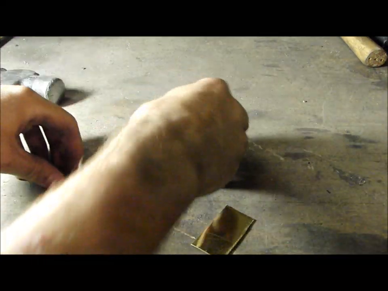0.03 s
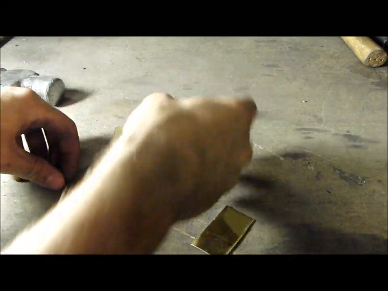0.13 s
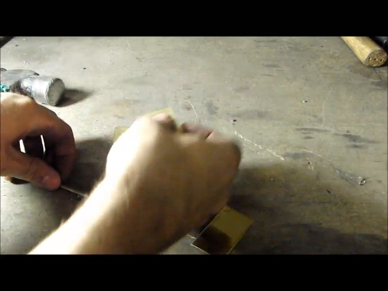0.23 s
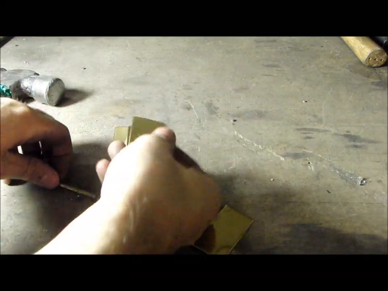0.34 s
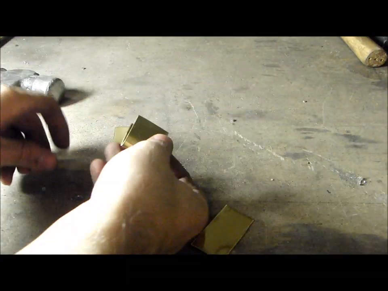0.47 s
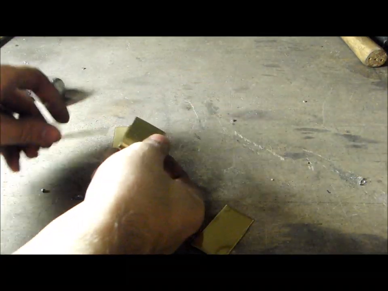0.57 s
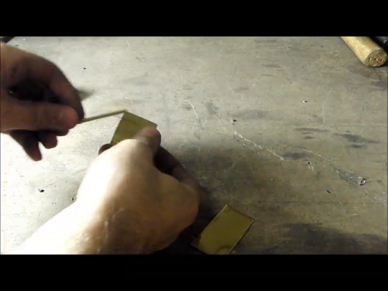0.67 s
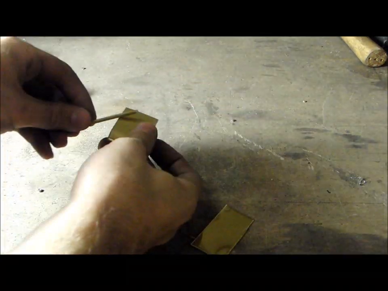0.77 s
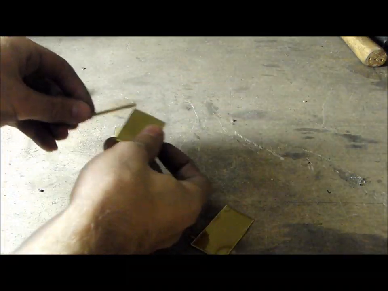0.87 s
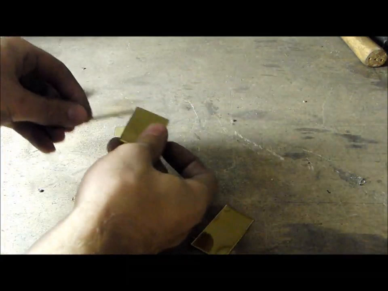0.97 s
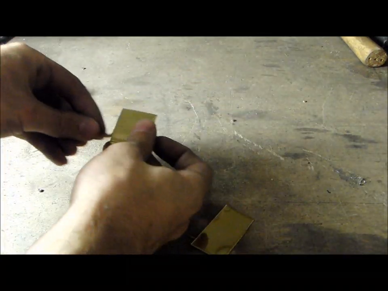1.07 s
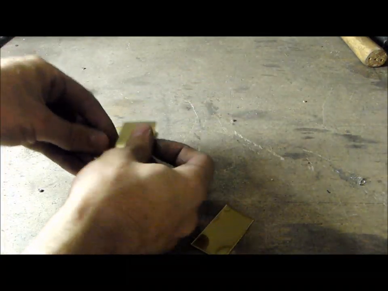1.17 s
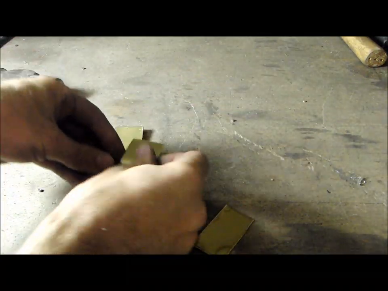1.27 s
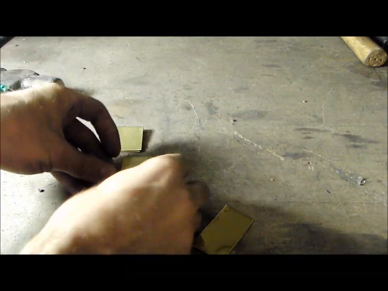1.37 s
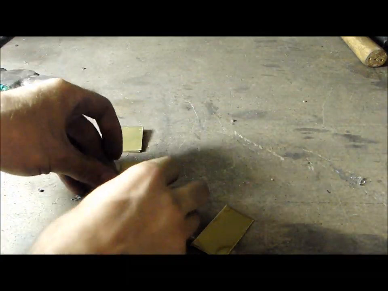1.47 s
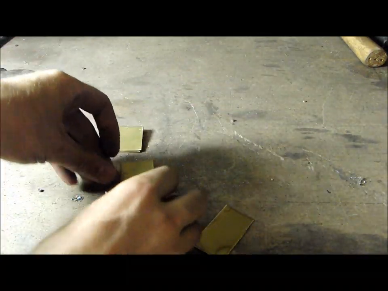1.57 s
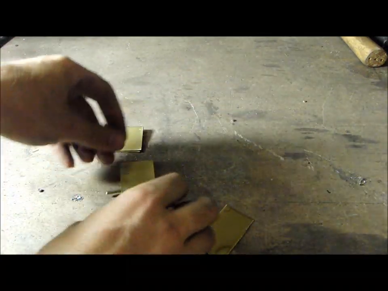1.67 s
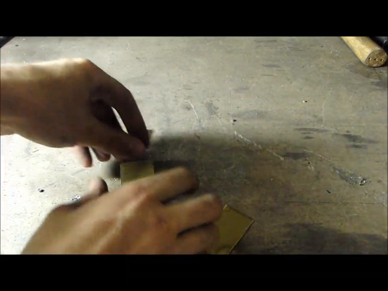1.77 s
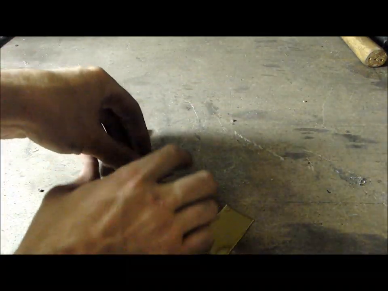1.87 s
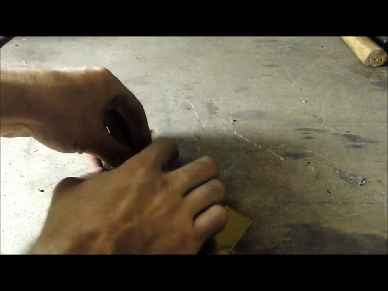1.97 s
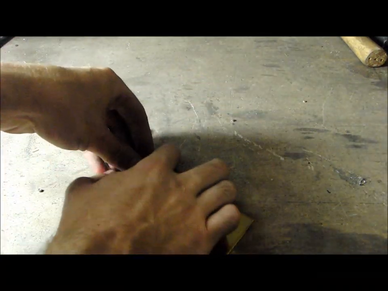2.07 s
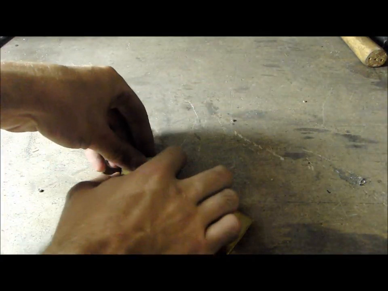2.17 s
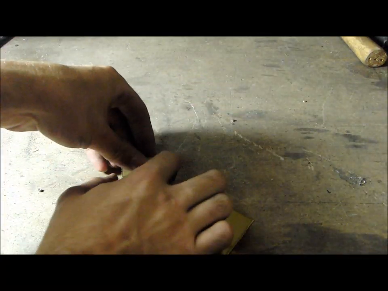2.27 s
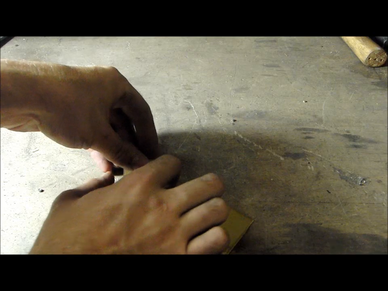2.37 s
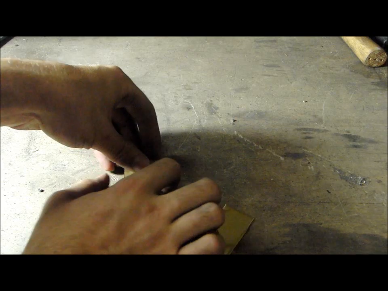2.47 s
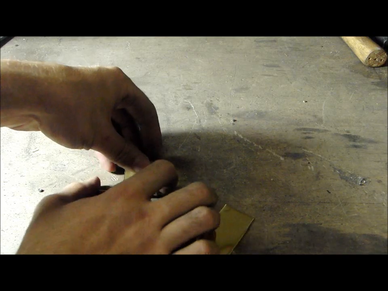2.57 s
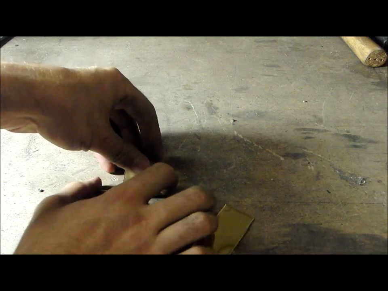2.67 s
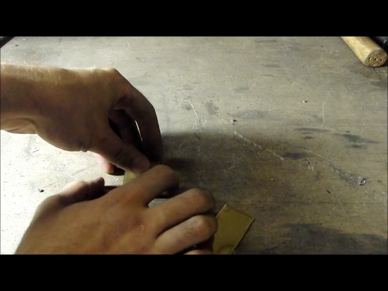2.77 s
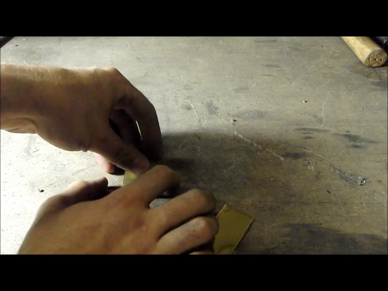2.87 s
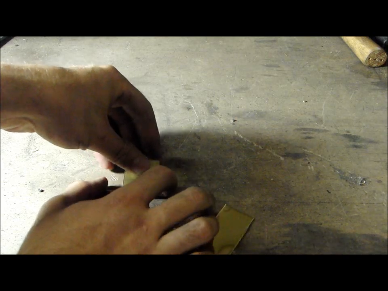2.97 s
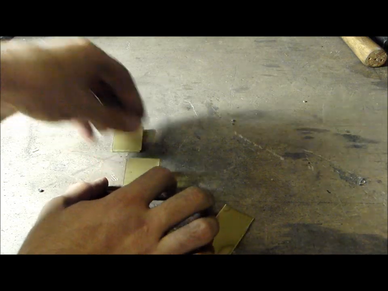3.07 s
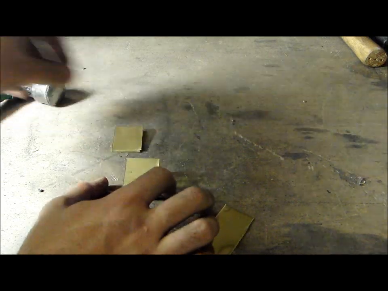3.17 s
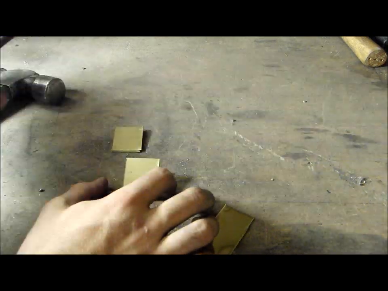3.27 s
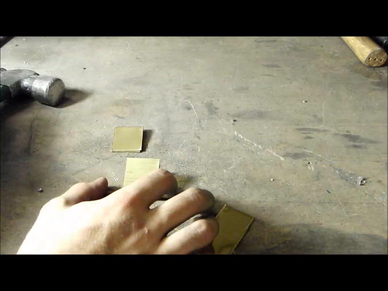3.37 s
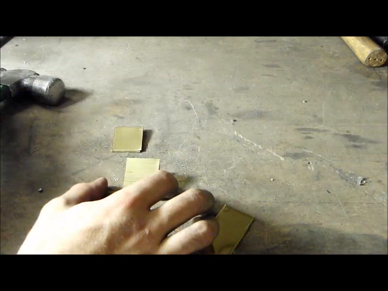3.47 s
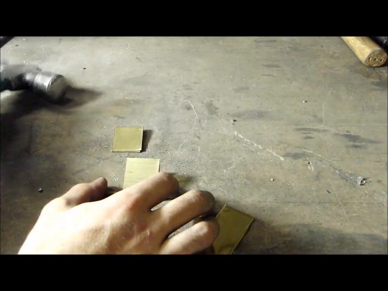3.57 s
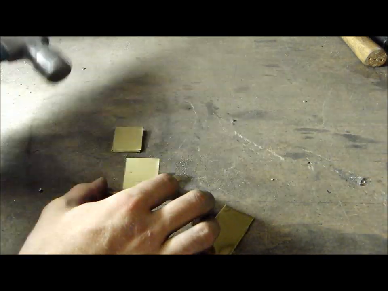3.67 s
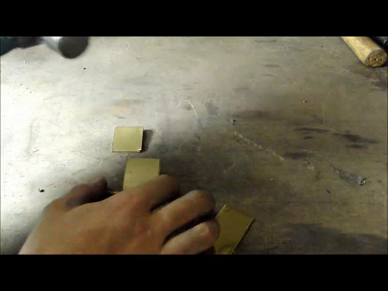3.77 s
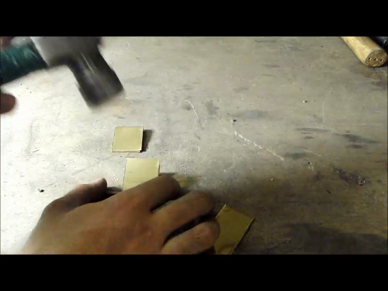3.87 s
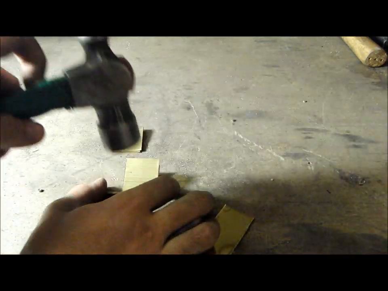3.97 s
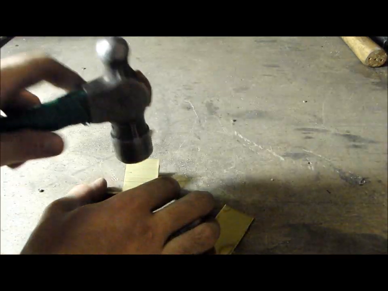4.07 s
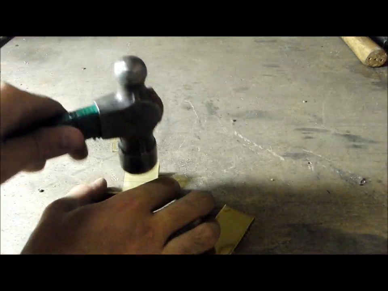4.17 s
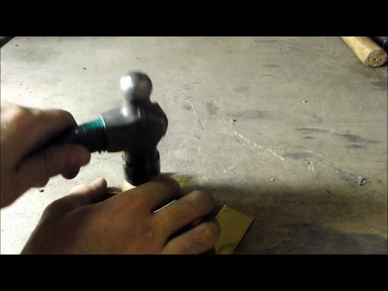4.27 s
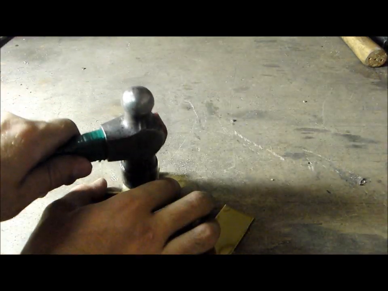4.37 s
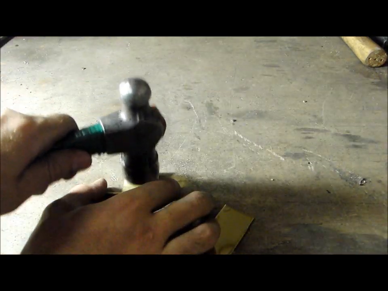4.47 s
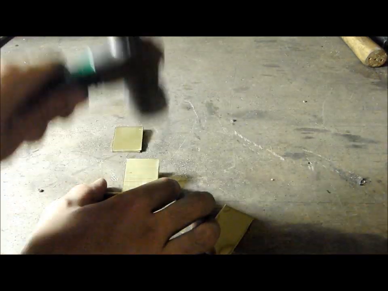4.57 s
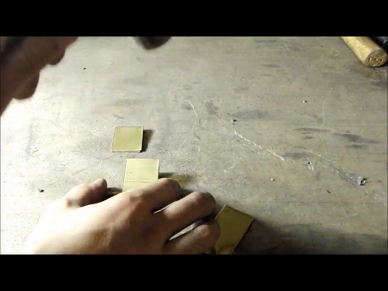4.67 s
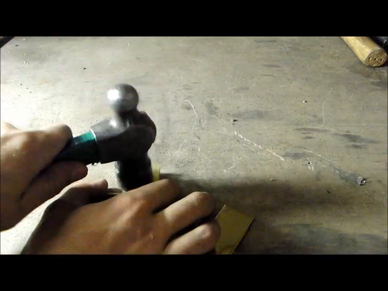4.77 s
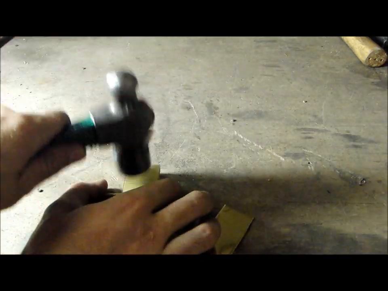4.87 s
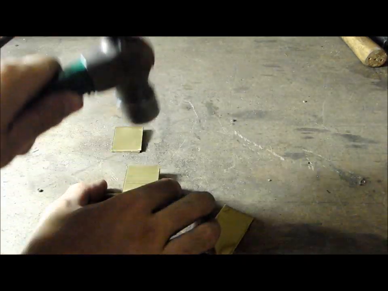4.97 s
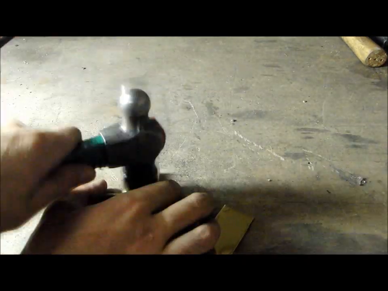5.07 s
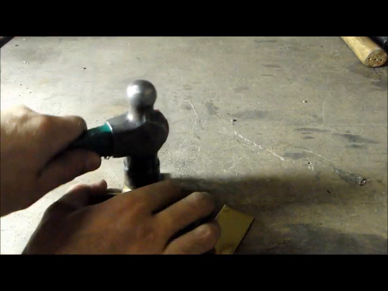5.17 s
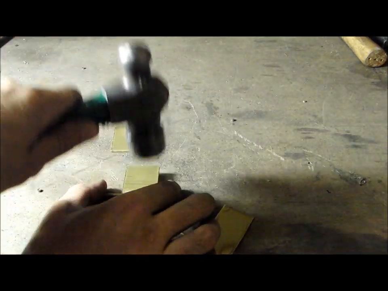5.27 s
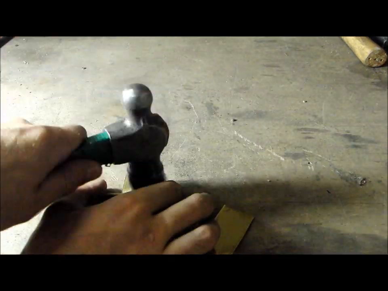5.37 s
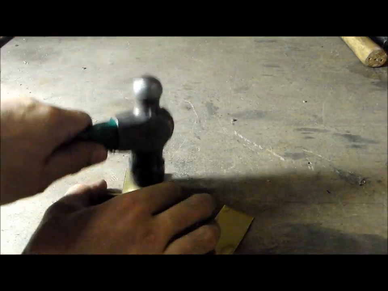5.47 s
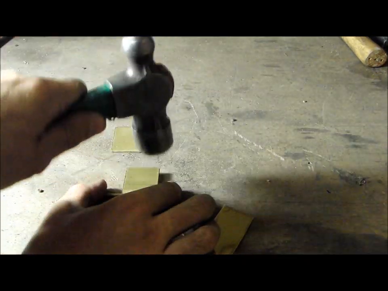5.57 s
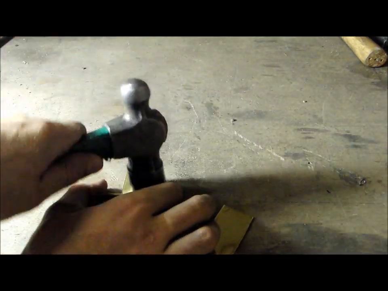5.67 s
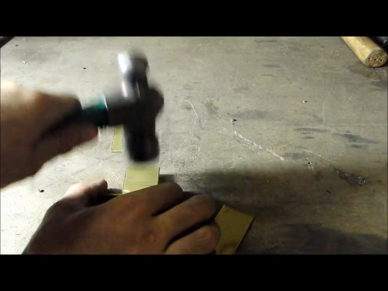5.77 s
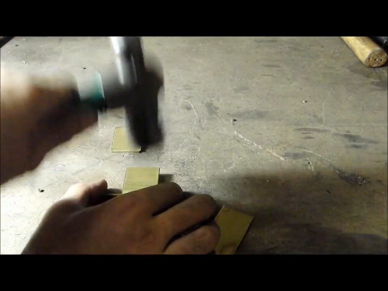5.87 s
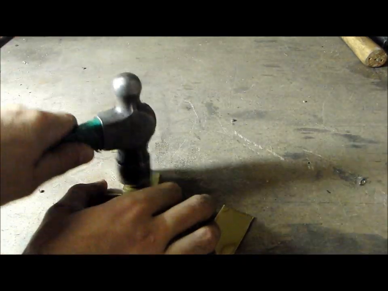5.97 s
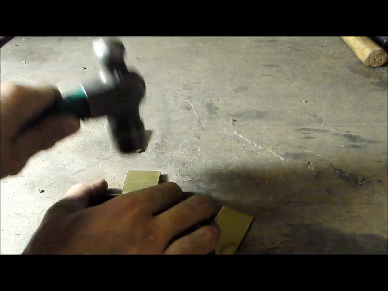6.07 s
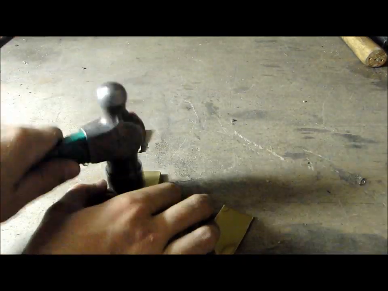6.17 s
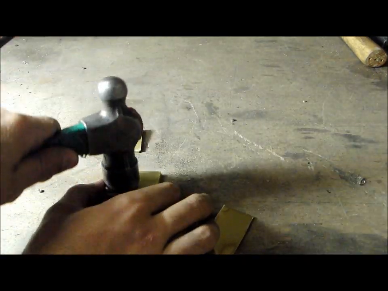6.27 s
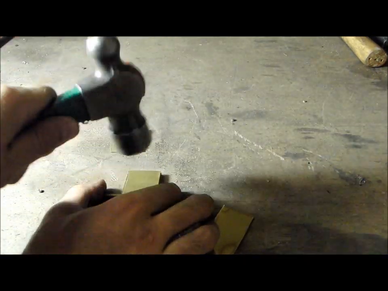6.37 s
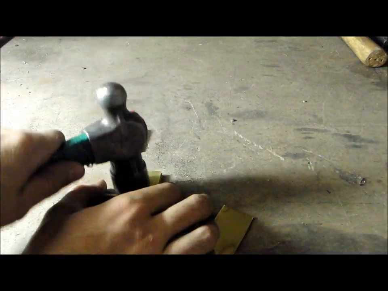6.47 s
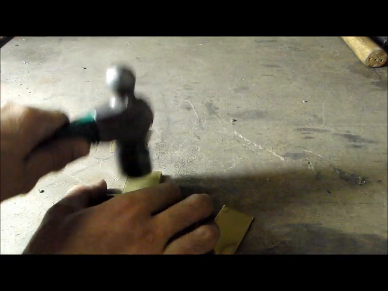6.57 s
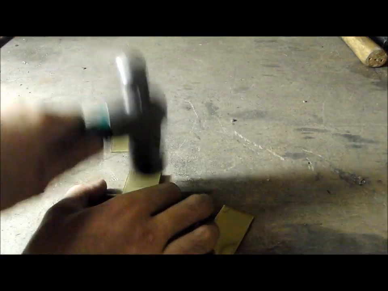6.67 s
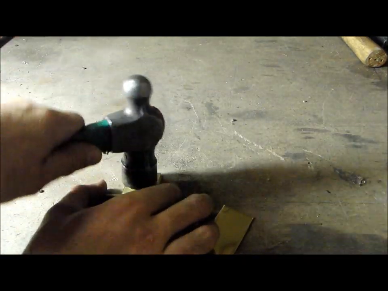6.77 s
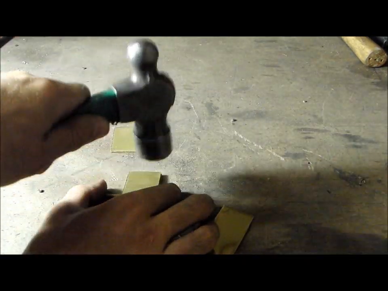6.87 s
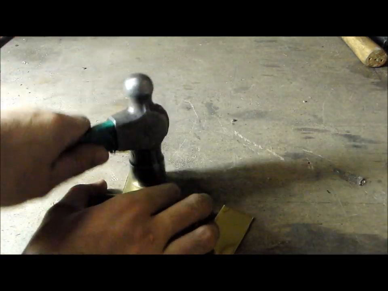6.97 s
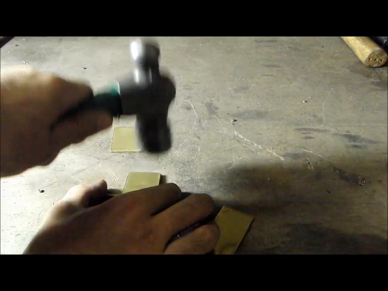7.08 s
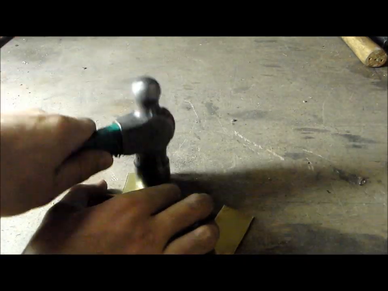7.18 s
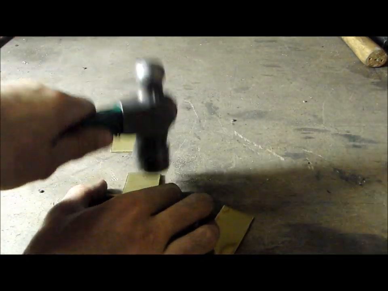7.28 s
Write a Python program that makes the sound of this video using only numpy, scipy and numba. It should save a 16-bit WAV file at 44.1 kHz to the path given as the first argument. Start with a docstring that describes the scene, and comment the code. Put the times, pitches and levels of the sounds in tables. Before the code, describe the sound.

Quiet handling of small brass blanks: gritty little slides, damped clicks, a clear clink on the worktop, then barely audible ticks. A dull hollow knock marks the hammer being lifted. A tiny metallic contact precedes ten separate blows, the first ones strongest, each a harsh papery metal smack with a woody thump and short room tail. Rumble and hiss sit beneath, pushed down by automatic gain once hammering begins.

```python
"""Small workshop, hard worktop: small brass blanks are handled, scraped and dropped (damped modes, tick and grit
noise); a hammer is picked up, set on a folded strip, then taps it flat ten times. Each blow slaps the fold shut
(shaped noise), thumps the worktop (modes and noise bands) and rings the room (diffuse tails), over rumble and hiss.
Gain control ducks loud sounds, hiss included, then creeps back up; what is still too loud overloads softly."""
import sys
import numpy as np
from scipy import signal
from scipy.fft import rfft, irfft
from scipy.io import wavfile
from numba import njit

SR = 44100
rng = np.random.default_rng(int(sys.argv[2]) if len(sys.argv) > 2 else 0)


def digitize_waveform(pressure):
    """Quantize a signal to 16-bit integers and store it at the path in sys.argv[1].

    Rows of a 2-D input are taken as channels; values are limited to [-1, 1].
    """
    field = np.atleast_2d(pressure).T
    bounded = np.clip(field, -1, 1)
    quanta = np.round(bounded * 32767).astype(np.int16)
    wavfile.write(sys.argv[1], SR, quanta)


N = 323253
TIME_S = np.arange(SR) / SR  # span of a single sound

# hammer on the fold, set down in three light contacts, the last pressing the fold onto the worktop, then tapping:
# (time [s], force level [dB], slap level [dB], fold pitch [Hz])
HAMMER_BLOWS = [(4.2860, -50, -25, 5270), (4.2981, -33, -28, 2930), (4.318, -30.5, -35, 5570),
                (4.7186, -1, 4.5, 4470), (5.0302, 0.5, 2, 4480), (5.3196, -4, 3, 5400),
                (5.5823, -3.5, 3, 5390), (5.864, -9, 1.5, 3170), (6.1271, -15, -17.5, 4370),
                (6.3964, -9, -13.5, 4480), (6.6517, -10.5, -6, 4300), (6.8929, -12.5, -6.5, 5160),
                (7.1155, -11, 0.5, 4930)]
# worktop modes, close low pairs beat in the tail: (frequency [Hz], level [dB], t60 [s])
WORKTOP_MODES = [(70.5, -10.5, 0.12), (97, -9, 0.031), (136.9, -25.5, 1), (138.35, -17, 0.87),
                 (152.54, -21, 0.93), (164.8, 6, 0.088), (184.7, -14.5, 0.56), (234, -7.5, 0.2),
                 (262, -8, 0.082), (280, -28.5, 0.86), (344.3, -4, 0.11), (416.7, -17, 0.13),
                 (788.7, -3.5, 0.078), (1226, -15, 0.032), (1300, -11, 0.012), (1821, -6, 0.085),
                 (2124, -4.5, 0.045), (2742, -9, 0.057), (2660, -15.5, 0.07), (3380, -15.5, 0.12),
                 (4550, -2.5, 0.046), (4890, -13, 0.13)]
# dense, unresolved worktop modes: (frequency [Hz], level [dB], t60 [s])
WORKTOP_CLATTER = [(28.55, -11.5, .15), (70.5, 20.5, 0.14), (302, 17.5, 0.16), (546, 10, 0.19),
                   (990, 6.5, 0.17), (1810, 6, 0.16), (2780, 6, 0.17), (5080, -4, 0.18), (7040, -12, 0.21),
                   (9300, -15, 0.088), (14540, -25, 0.059)]
# fold slapping shut: (frequency [Hz], level [dB])
SLAP_SPECTRUM = [(200, -4), (1000, -10), (2000, 7), (3200, 8.5), (4800, 12), (5700, 10), (7000, 8.5),
                 (8500, 0.5), (10500, -16.5), (15000, -8)]
# brass blank touched or dropped: (time [s], level [dB], brightness [dB], share of free ring time [0..1])
BLANK_CLINKS = [(0.3637, -72, -3, 0.12), (.657, -37.5, -31, 0.35), (.702, -43, -20, 0.19),
                (0.742, -42.5, -18, 0.18), (0.798, -34, -14, 0.39), (0.8195, -33, -5, 0.32),
                (.956, -37.5, 1, 0.56), (1.085, -31, 10.5, 0.24), (1.2179, -30, 11.5, 0.43),
                (1.292, -32.5, -7, .2), (1.3004, -14, 6.5, 1), (1.3152, -23.5, 10, 0.32),
                (1.5055, -39, -3.5, 0.52), (1.543, -41.5, 3, 0.79), (1.625, -50.5, -5, 0.32),
                (1.7204, -57.5, -21.5, 0.41), (1.875, -57.5, 4, 0.17), (2.093, -52.5, -5, 0.21),
                (2.306, -52, -10, 0.18), (2.981, -56, 6, 0.23), (3.014, -61, 5, .15),
                (4.287, -32, 25, 0.23)]
# brass blank ringing freely: (frequency [Hz], level [dB], t60 [s])
BRASS_MODES = [(2536, -15, .22), (4549, -9, .2), (4667, -16, .14), (4888, 0, .18), (5150, -19, .08),
               (7225, -17, .14), (7245, -27, .35), (8166, -29, .16), (8522, -33, .24), (11780, -38, .11),
               (13970, -41, .1), (14650, -39, .09)]
# click of a thin edge: (frequency [Hz], level [dB], t60 [s])
EDGE_TICK = [(205, -18, 0.04), (877, -25, 0.021), (1710, -4.5, 0.045), (3000, -6.5, 0.081),
             (5000, -7.5, 0.046), (7700, -16.5, 0.13), (14800, -19, 0.062)]
# brass sliding: (time [s], length [s], level [dB])
BRASS_SCRAPES = [(0.079, .1, -49), (0.356, 0.026, -46.5), (0.382, .07, -57.5), (0.657, 0.05, -49),
                 (0.789, 0.026, -48.5), (0.955, .068, -45.5), (1.294, 0.044, -37.5), (1.323, .05, -45),
                 (1.403, .03, -51), (1.502, 0.057, -49.5), (2.045, 0.099, -54.5), (2.301, 0.2, -63.5)]
# scrape noise: (frequency [Hz], level [dB])
GRIT_SPECTRUM = [(250, -1.5), (570, -10), (780, 9.5), (1400, 3), (2000, 3.5), (3000, 3), (4000, -1.5),
                 (4900, -0.5), (6500, -9.5), (15000, -27)]
# hammer bumping the worktop as it is picked up:
# (time [s], handle level [dB], worktop level [dB], rattle level [dB])
HAMMER_BUMPS = [(3.279, -60, -47, -54.5), (3.5268, -18, -39, -39.5)]
# hammer handle modes: (frequency [Hz], level [dB], t60 [s])
HANDLE_MODES = [(207, -20, 0.43), (315, -1, 0.076), (341, -3.5, 0.072), (448, -18, 0.16),
                (474, -12.5, 0.094), (560, -3, 0.041), (622, -10.5, 0.071), (741, -20, 0.089)]
# thin squeak of steel dragging: (time [s], length [s], pitch [Hz], level [dB])
STEEL_SQUEAKS = [(3.268, 0.044, 2860, -63), (3.356, 0.14, 2955, -63.5)]
# room tail: (frequency [Hz], level against the direct sound [dB], t60 [s])
WORKSHOP_TAIL = [(60, -14.5, 0.48), (308.7, -10, .55), (530, -14.5, 0.33), (1110, -12.5, 0.31),
                 (2023, -13, 0.49), (3200, -15, 0.6), (4670, -15, 0.61), (6900, -13, 0.39),
                 (10000, -12, 0.4), (15000, 2.5, 0.084)]
# room rumble and microphone hiss, ahead of the gain control: (frequency [Hz], level [dB])
HISS_SPECTRUM = [(20, -40), (55, -32.5), (100, -47), (150, -45), (300, -50.5), (600, -55.5), (1000, -57),
                 (1800, -61.5), (3000, -62), (5000, -64.5), (6700, -65), (9000, -68), (15500, -69)]
# narrow microphone dips: (frequency [Hz], width [Hz], depth [dB])
MIC_NOTCHES = [(4015, 490, -15.5), (6156, 660, -13.5), (7820, 930, -16), (10150, 1100, -8.5)]

# blow: bass offset, bass and low swell per dB of force
THUMP_DB, THUMP_DB_PER_DB = -4.5, 0.78
# below this force the fold barely meets the worktop: thump lost per dB
HOLLOW_DB, HOLLOW_LOSS_DB_PER_DB = -25, 2.17
# contact time on a flat fold, and what an open fold adds under a 0 dB blow
FLAT_CLOSE_MS, GAP_CLOSE_MS = 0.79, 2.5
FLATTENING = 0.6  # gap shrinks by exp(-FLATTENING) under a 0 dB blow
# the low ring swells once more after each blow
SWELL_S, SWELL_WIDTH_S, SWELL_HZ, SWELL_DB = 0.194, 0.008, 159.5, -16

# the blank is in the fingers between these times, else on the worktop
HELD_FROM_S, HELD_TO_S = 0.38, 1.26
# lowest mode against the main one: fingers smother it, the worktop drives it
HELD_LOW_DB, RESTING_LOW_DB = -32, 10
# fingers favour the mode just under the main one, and lower the pitch by this share
HELD_PAIR_DB, HELD_SAG = 9.5, 0.0055
# edge click: in the fingers, pinned to the worktop, lying free on it
HELD_TICK_DB, PINNED_TICK_DB, FREE_TICK_DB = -6, 18, -16
# held clicks lose body below the upper corner
HELD_TICK_CORNERS_HZ, HELD_TICK_LOW_DB = (900, 1700), -15
PINNED_RISE = 0.2  # share the lowest mode rises when fully pressed down
# low voice of a scrape
HELD_BODY_DB, RESTING_BODY_DB = -38, 2.5
# ring of a rubbed, held blank, and its share of free ring time
RUB_RING_DB, RUB_FREE = -19.5, 0.08
# faint random ticks while the blank is nudged into place; NUDGE_FREE is the mean share of free ring time
NUDGE_FROM_S, NUDGE_TO_S = 1.38, 2.5
NUDGE_DB, NUDGE_SCATTER_DB, NUDGE_BRIGHT_DB, NUDGE_FREE = -65.5, 4, -8, 0.34
TOP_HZ = 16000


def hammer(corners_hz=(330, 900, 2400, 4500), spot_db=4.0, spread_hz=1500, detune=0.015,
           slap_db=-1, modes_db=-1, shake_wet_db=-1, slap_count=2):
    """Each blow slaps the fold shut and shakes the worktop; a flatter fold gives shorter slaps."""
    out, gap = np.zeros(N), 1
    hz, mode_db, t60_s = np.transpose(WORKTOP_MODES)
    swell = np.exp(-((TIME_S - SWELL_S) / SWELL_WIDTH_S) ** 2) * np.sin(2 * np.pi * SWELL_HZ * TIME_S)
    for start_s, blow_db, treble_db, fold_hz in HAMMER_BLOWS:
        close_ms = FLAT_CLOSE_MS + GAP_CLOSE_MS * gap * amp(blow_db)
        gap = gap * np.exp(-FLATTENING * amp(blow_db))

        hollow_db = HOLLOW_LOSS_DB_PER_DB * max(HOLLOW_DB - blow_db, 0)
        thump_db = THUMP_DB_PER_DB * blow_db + THUMP_DB - hollow_db
        # little slap: dull in the worktop too
        upper_db = min(blow_db, treble_db)
        force_db = [thump_db, blow_db, upper_db, (upper_db + treble_db) / 2]

        # the spot struck wanders; only short waves notice
        wander = rng.standard_normal((2, len(hz))) * np.minimum(hz / spread_hz, 1)
        modes = np.transpose([hz * (1 + detune * wander[0]), mode_db + spot_db * wander[1], t60_s])
        body = amp(modes_db) * ring(modes, tilt(WORKTOP_MODES, corners_hz, force_db))
        clatter = wash(WORKTOP_CLATTER, tilt(WORKTOP_CLATTER, corners_hz, force_db))
        closing = TIME_S * 1000 / close_ms
        shake = (1 - np.exp(-2 * closing)) * (clatter - body)

        # a quicker slap packs the same energy into a higher peak
        burst = amp(treble_db + slap_db) * closing * np.exp(1 - closing) / np.sqrt(close_ms)
        # the slap differs by direction: the first is direct, all feed the room
        slaps = [burst * slap(fold_hz, close_ms) for _ in range(slap_count)]
        slap_room = sum(map(reflections, slaps)) / np.sqrt(slap_count)
        room = slap_room + amp(shake_wet_db) * reflections(shake)
        late_swell = amp(thump_db + SWELL_DB) * swell
        add(out, start_s, slaps[0] + shake + room + late_swell)
    return out


def slap(fold_hz, close_ms, peak_db=6, width_octaves=0.13, crisp_db=4, corners_hz=(6000, 11000)):
    """Noise peaking at the fold's own pitch, crisper the faster the fold closes."""
    points_hz, points_db = np.transpose(SLAP_SPECTRUM)
    hz = np.geomspace(100, SR / 2, 200)
    base = np.interp(np.log(hz), np.log(points_hz), points_db)
    peak = peak_db * np.exp(-(np.log2(hz / fold_hz) / width_octaves) ** 2)
    top = np.interp(hz, corners_hz, [0, -crisp_db * np.log2(close_ms)])
    return noise(np.transpose([hz, base + peak + top]))


def clinks(corners_hz=(2700, 4550, 4880, 7000), grip_detune=0.018):
    """Fingers damp and detune the blank; dropped, it rings freely; pinned, it mostly ticks."""
    out = np.zeros(N)
    for start_s, db, bright_db, free in BLANK_CLINKS + nudges():
        if held(start_s):
            low_db, pair_db, tick_db, sag = HELD_LOW_DB, HELD_PAIR_DB, HELD_TICK_DB, HELD_SAG
        else:
            low_db, pair_db, sag = RESTING_LOW_DB, 0, 0
            tick_db = np.interp(free, [0, 1], [PINNED_TICK_DB, FREE_TICK_DB])
        damped = max(1 - free, 0)
        pitch_ratio = 1 - sag + grip_detune * damped * rng.standard_normal()
        modes = np.array([(hz * pitch_ratio, mode_db, t60_s * free) for hz, mode_db, t60_s in BRASS_MODES])
        modes[0, 0] *= 1 + PINNED_RISE * (1 - free) ** 2
        # a harder contact trades the lowest mode for the upper ones
        tone_db = [low_db - bright_db, pair_db, 0, bright_db]
        tone = ring(modes, tilt(BRASS_MODES, corners_hz, tone_db))
        thin_db = tilt(EDGE_TICK, HELD_TICK_CORNERS_HZ, [HELD_TICK_LOW_DB * held(start_s), 0])
        contact = tone + amp(tick_db) * wash(EDGE_TICK, thin_db)
        add(out, start_s, amp(db) * signal.fftconvolve(contact, chatter(np.sqrt(damped))))
    return out


def nudges(count=14):
    """Faint random contacts of the rocking blank, as rows like those of BLANK_CLINKS."""
    rows = []
    for when, size, loose in rng.random((count, 3)):
        start_s = np.interp(when, [0, 1], [NUDGE_FROM_S, NUDGE_TO_S])
        db = NUDGE_DB + NUDGE_SCATTER_DB * (2 * size - 1)
        rows.append((start_s, db, NUDGE_BRIGHT_DB, NUDGE_FREE * (0.5 + loose)))
    return rows


def chatter(strength, count=4, span_s=0.0052, bounce=0.39):
    """Force impulses: a first contact, then a few irregular micro-bounces."""
    force = np.zeros(SR // 10)
    when_s = rng.uniform(0, span_s, count)
    sizes = bounce * rng.standard_normal(count) * np.exp(-when_s / span_s)
    force[(when_s * SR).astype(int)] = strength * sizes
    force[0] = 1
    return force


def held(time_s):
    """Whether the blank is up in the fingers, which damp it."""
    return HELD_FROM_S < time_s < HELD_TO_S


def scrapes(corners_hz=(900, 2500), grain_db=4, grain_hz=500):
    """An edge catches and slips in uneven grains; a held blank sings along, a resting one gains a low voice."""
    out = np.zeros(N)
    hz, grit_db = np.transpose(GRIT_SPECTRUM)
    blank = ring([(f, db, t60_s * RUB_FREE) for f, db, t60_s in BRASS_MODES])
    for start_s, length_s, db in BRASS_SCRAPES:
        catches_db = np.interp(TIME_S * grain_hz, np.arange(SR), grain_db * rng.standard_normal(SR))
        stroke = np.sqrt(np.maximum(np.sin(np.pi * np.minimum(TIME_S / length_s, 1)), 0))
        body_db = HELD_BODY_DB if held(start_s) else RESTING_BODY_DB
        spectrum = np.transpose([hz, grit_db + tilt(GRIT_SPECTRUM, corners_hz, [body_db, 0])])
        grit = amp(db + catches_db) * stroke * noise(spectrum)
        add(out, start_s, grit)
        if held(start_s):
            add(out, start_s, amp(RUB_RING_DB) * signal.fftconvolve(grit, blank))
    return out


def bumps(soft_s=0.0043, corners_hz=(200, 900), dull_db=-14,
          rattle_corners_hz=(1500, 6000), rattle_dull_db=-10):
    """The handle lands softly: a hollow knock with a dull rattle of the worktop."""
    out = np.zeros(N)
    for start_s, handle_db, worktop_db, rattle_db in HAMMER_BUMPS:
        handle = ring(HANDLE_MODES, handle_db) * (1 - np.exp(-TIME_S / soft_s))
        body = ring(WORKTOP_MODES, worktop_db + tilt(WORKTOP_MODES, corners_hz, [0, dull_db]))
        rattle_tilt_db = tilt(WORKTOP_CLATTER, rattle_corners_hz, [0, rattle_dull_db])
        rattle = wash(WORKTOP_CLATTER, rattle_db + rattle_tilt_db)
        add(out, start_s, handle + body + rattle)
    return out


def squeaks(waver=0.0039, waver_hz=200):
    """Stick and slip settle on one unsteady pitch: a wavering sine."""
    out = np.zeros(N)
    for start_s, length_s, hz, db in STEEL_SQUEAKS:
        drift = np.interp(TIME_S * waver_hz, np.arange(SR), rng.standard_normal(SR))
        phase = 2 * np.pi * np.cumsum(hz * (1 + waver * drift)) / SR
        swell = np.sin(np.pi * np.minimum(TIME_S / length_s, 1))
        add(out, start_s, amp(db) * swell * np.sin(phase))
    return out


def reflections(x, first_wall_s=0.013):
    """A diffuse tail of decaying noise, drawn anew at each call, builds up once the nearest walls answer."""
    t60_s = np.array(WORKSHOP_TAIL)[:, 2]
    unit_energy_db = -10 * np.log10(t60_s * SR / (2 * np.log(1000)))
    build_up = 1 - np.exp(-(TIME_S / first_wall_s) ** 2)
    tail = wash(WORKSHOP_TAIL, unit_energy_db) * build_up
    return signal.fftconvolve(x, tail)[:len(x)]


def hiss():
    """Steady room rumble and microphone hiss as shaped noise."""
    return noise(HISS_SPECTRUM, size=N)


def amp(db):
    """Decibels to gain."""
    return 10 ** (np.asarray(db) / 20)


def fade(t60_s):
    """Exponential decay that loses 60 dB in t60_s."""
    return np.exp(-np.log(1000) * TIME_S / max(t60_s, 1e-3))


def add(track, start_s, sound):
    """Mix a sound into the track."""
    i = max(int(start_s * SR), 0)
    track[i:i + len(sound)] += sound[:N - i]


def colour(x, hz, gains):
    """Filter by gains joined on a log-frequency axis."""
    bins_hz = np.fft.rfftfreq(len(x), 1 / SR)
    return irfft(rfft(x) * np.interp(np.log(bins_hz + 1), np.log(hz), gains), len(x))


def noise(spectrum, size=SR):
    """White noise shaped to (frequency [Hz], level [dB]) points."""
    hz, db = np.transpose(spectrum)
    fine_hz = np.geomspace(10, SR / 2, 400)
    fine_db = np.interp(np.log(fine_hz), np.log(hz), db)
    return colour(rng.standard_normal(size), fine_hz, amp(fine_db))


def wash(bands, extra_db=0):
    """Dense modes: a noise burst whose overlapping bands each have a level and decay."""
    hz, db, t60_s = np.transpose(bands)
    white = rfft(rng.standard_normal(SR))
    # bin number = Hz, as the burst lasts one second
    place = np.interp(np.log(np.arange(len(white)) + 1), np.log(hz), np.arange(len(hz)))
    out = np.zeros(SR)
    for k, gain in enumerate(amp(db + extra_db)):
        band = irfft(white * np.maximum(1 - abs(place - k), 0), SR)
        out += gain * band * fade(t60_s[k])
    return out


def ring(modes, extra_db=0):
    """Damped sines set off together."""
    hz, db, t60_s = np.transpose(modes)
    gains = amp(db + extra_db)
    return sum(g * np.sin(2 * np.pi * f * TIME_S) * fade(t) for f, g, t in zip(hz, gains, t60_s))


def tilt(table, corners_hz, corners_db):
    """Level at each row's frequency, joined between corners on a log axis."""
    return np.interp(np.log([row[0] for row in table]), np.log(corners_hz), corners_db)


def scene():
    """All the bench work in its room, over steady rumble and hiss."""
    handling = clinks() + scrapes() + bumps() + squeaks()
    return (hammer() + handling + reflections(handling) + hiss())[None]


@njit
def gain_control(x, start_db, limit, fall_db_per_s, rise_db_per_s, sense_s):
    """Gain drops fast while the output is too loud and creeps back up to unity."""
    y, gain_db, level = np.empty(len(x)), start_db, 0.
    for i in range(len(x)):
        y[i] = x[i] * 10 ** (gain_db / 20)
        level += (min(abs(y[i]), 3 * limit) - level) / (sense_s * SR)
        slope_db_per_s = -fall_db_per_s if level > limit else rise_db_per_s
        gain_db = min(gain_db + slope_db_per_s / SR, 0.)
    return y


def record(dry, start_db=-10.0, limit=0.094, fall_db_per_s=1810.0, rise_db_per_s=3.38,
           sense_s=0.001, ceiling=0.21, bass_hz=75):
    """Gain control, then soft overload, the microphone's thin bass and dips, top cut."""
    x = gain_control(dry[0], start_db, limit, fall_db_per_s, rise_db_per_s, sense_s)
    x = x / (1 + (x / ceiling) ** 4) ** (1 / 4)
    x = signal.sosfilt(signal.butter(N=3, Wn=bass_hz, btype="high", fs=SR, output="sos"), x)
    for hz, width_hz, depth_db in MIC_NOTCHES:
        band = signal.lfilter(*signal.iirpeak(hz, hz / width_hz, fs=SR), x)
        x = x - (1 - amp(depth_db)) * band
    return signal.sosfilt(signal.ellip(8, 0.2, 70, TOP_HZ, fs=SR, output="sos"), x)[None]


dry = scene()
out = record(dry)
digitize_waveform(out)
```